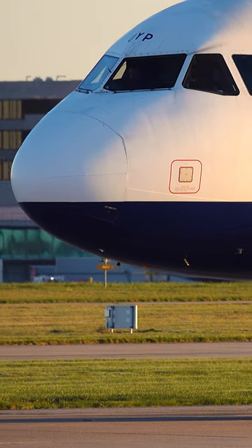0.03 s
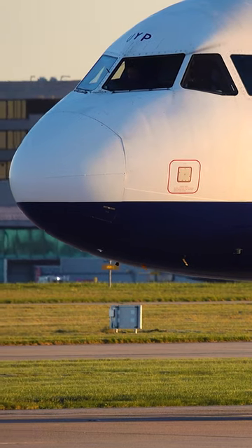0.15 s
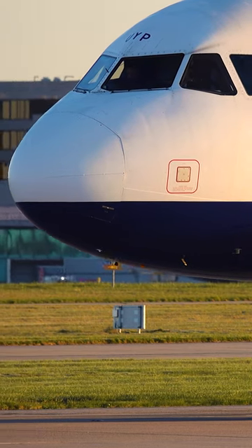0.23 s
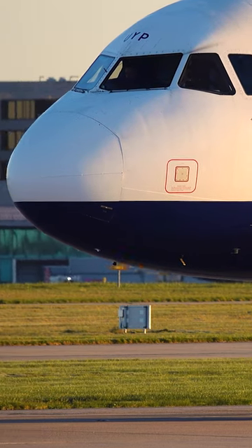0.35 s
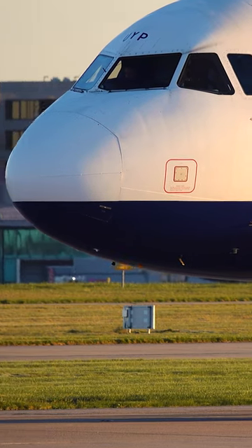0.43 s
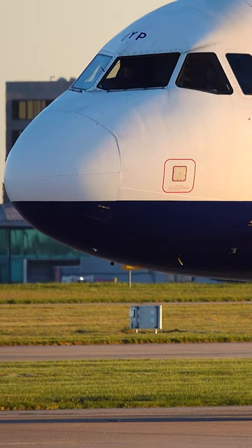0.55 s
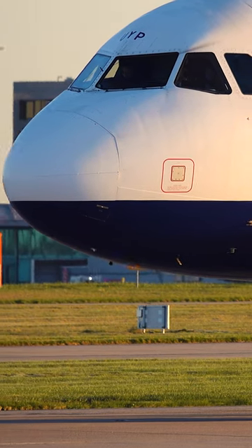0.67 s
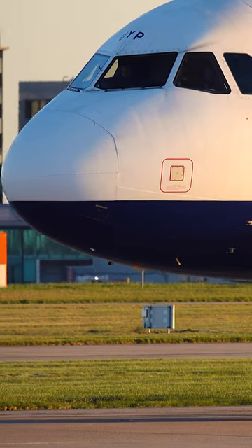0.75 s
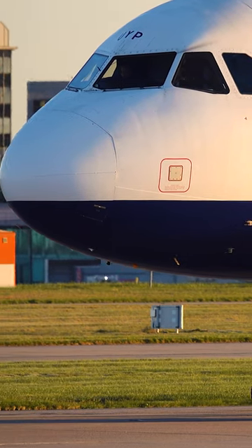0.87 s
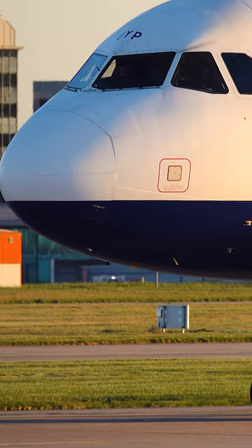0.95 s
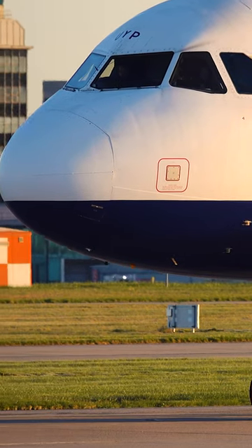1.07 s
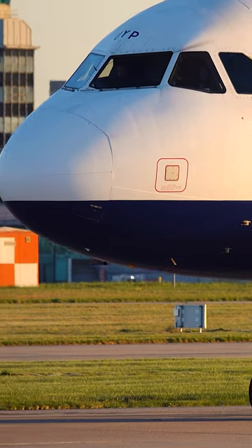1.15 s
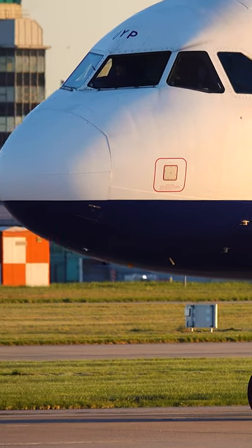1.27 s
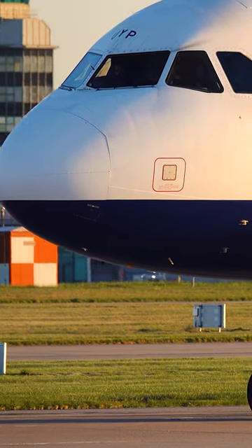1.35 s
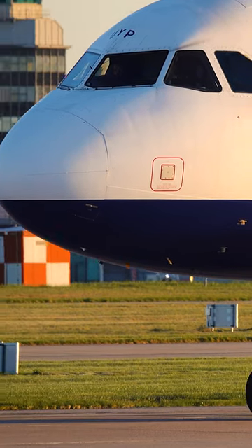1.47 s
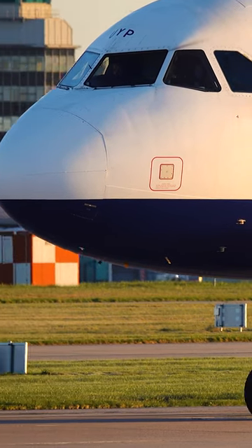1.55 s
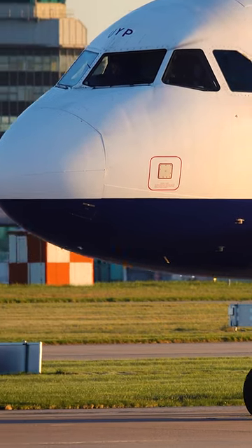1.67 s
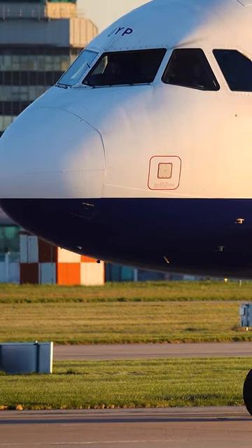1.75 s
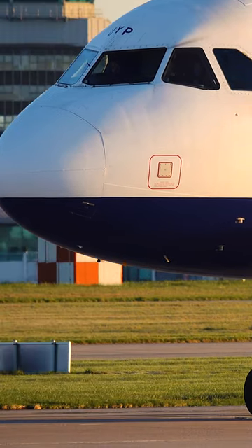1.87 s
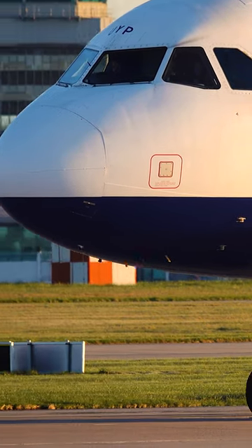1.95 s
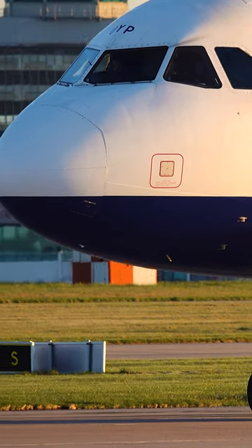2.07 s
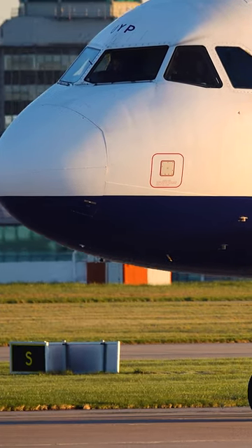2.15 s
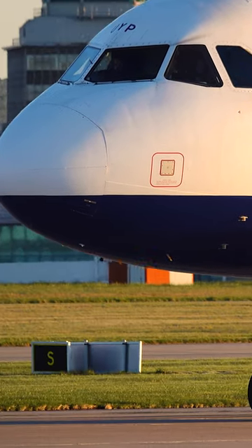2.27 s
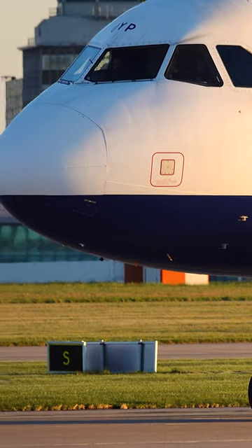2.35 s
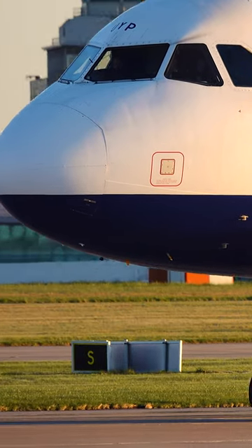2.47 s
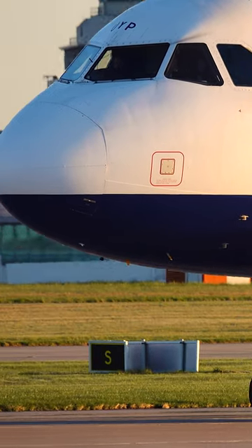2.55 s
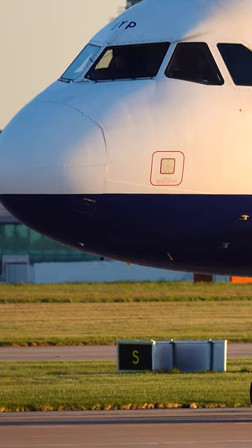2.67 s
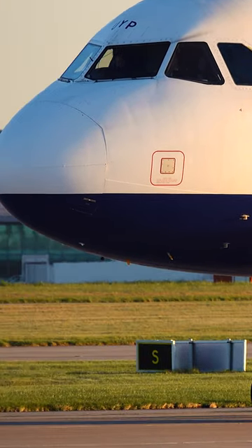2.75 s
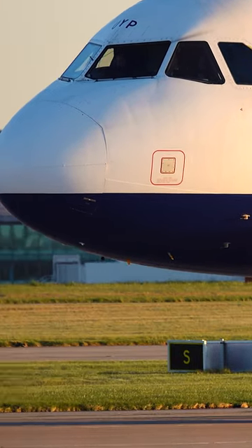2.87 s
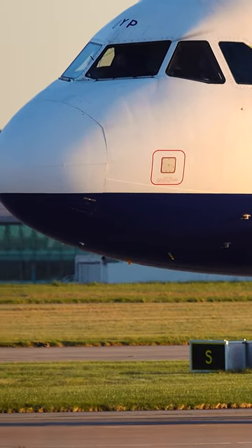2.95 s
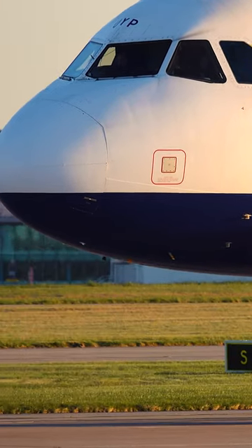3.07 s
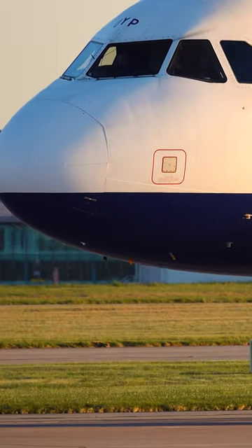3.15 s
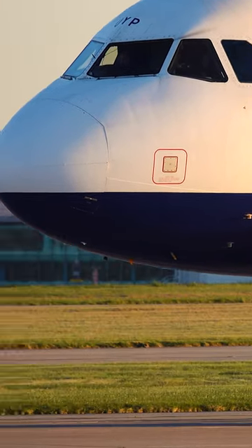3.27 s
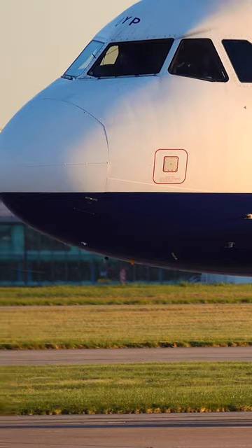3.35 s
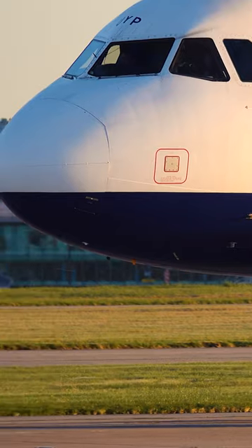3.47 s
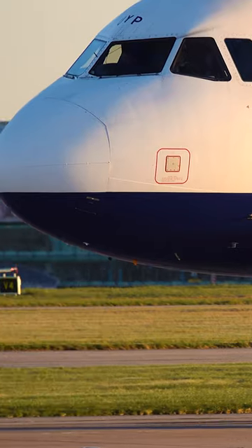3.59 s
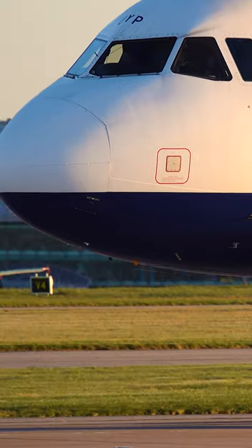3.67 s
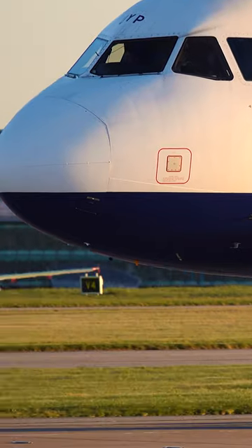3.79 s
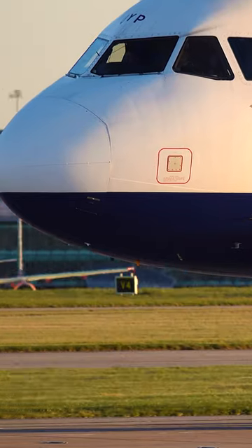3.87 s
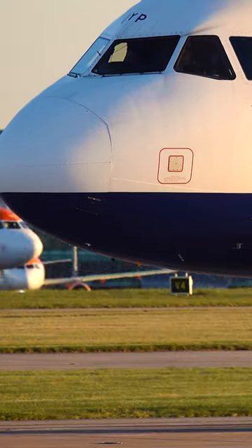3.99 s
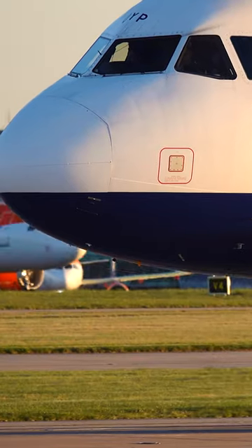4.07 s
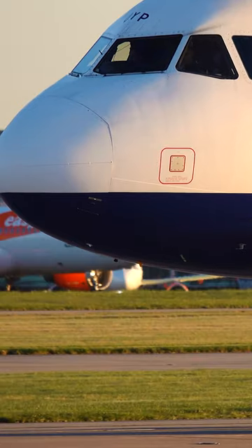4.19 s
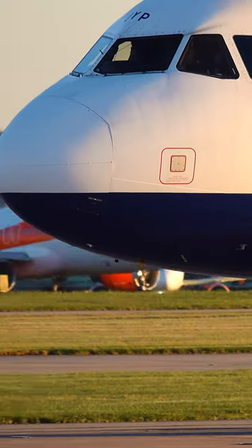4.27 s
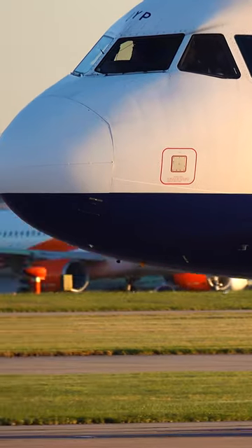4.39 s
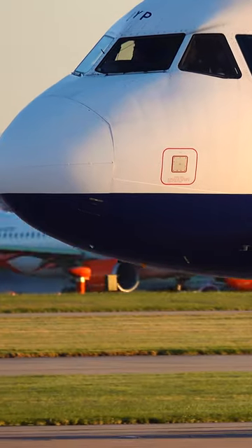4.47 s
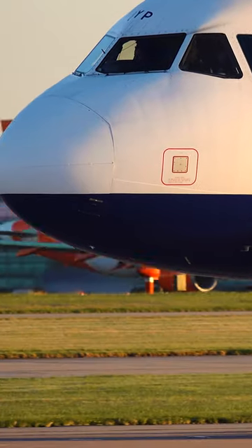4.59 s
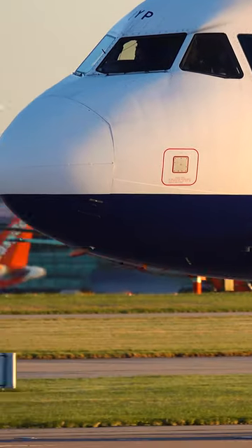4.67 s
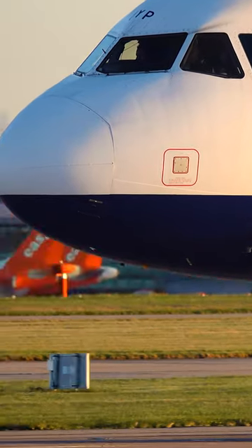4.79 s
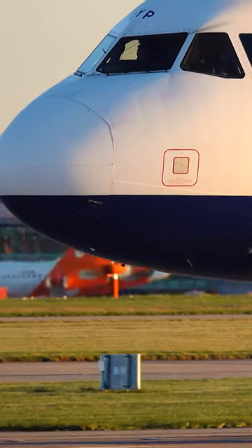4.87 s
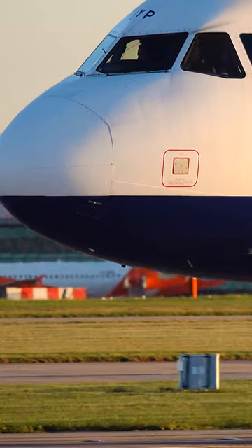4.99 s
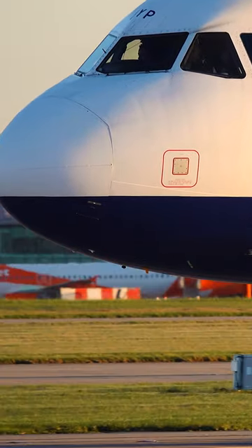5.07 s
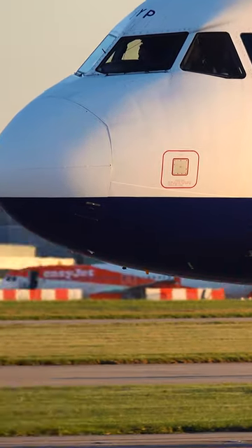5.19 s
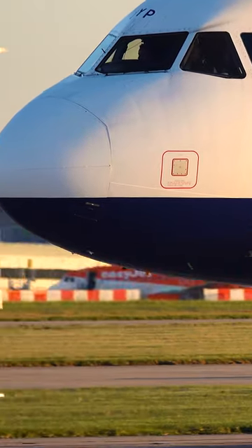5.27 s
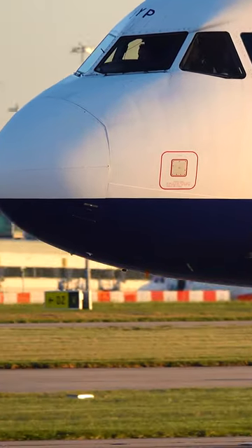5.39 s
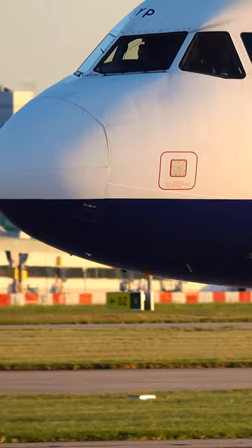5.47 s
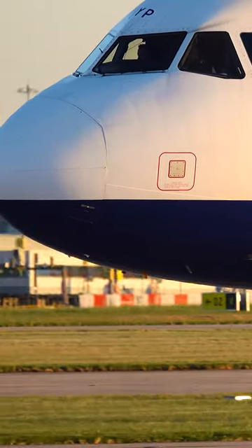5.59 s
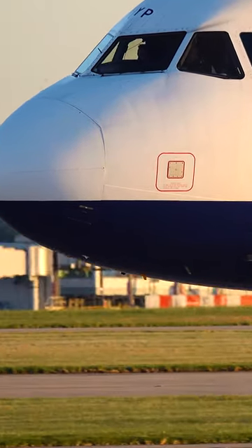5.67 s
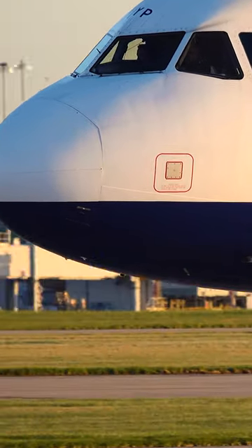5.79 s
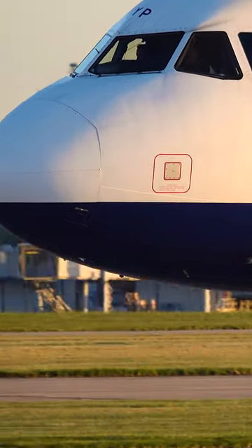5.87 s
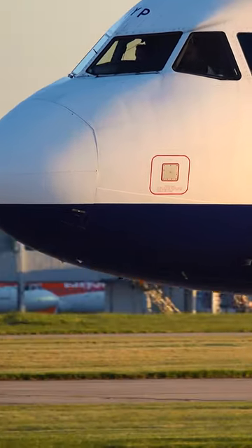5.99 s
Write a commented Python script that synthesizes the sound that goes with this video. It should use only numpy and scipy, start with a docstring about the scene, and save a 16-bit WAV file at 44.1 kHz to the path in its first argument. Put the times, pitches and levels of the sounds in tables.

```python
"""Across a grass verge from one microphone, a twin-jet airliner spools up and starts its take-off roll.
Two 22-blade fans whine slightly out of step, as sines that turbulent air roughens in level and phase.
Once the blade tips go supersonic, sines on many shaft orders and one repeating shock pattern buzz.
Exhaust roar and fan rush are coloured noises that grow with thrust; a thin tone lies under the start."""
import sys
import numpy as np
from scipy import signal
from scipy.fft import rfft, irfft
from scipy.io import wavfile

SR = 44100
rng = np.random.default_rng(int(sys.argv[2]) if len(sys.argv) > 2 else 0)


def ratio_of_db(decibels):
    """Turn decibels (scalar or array-like) into linear amplitude factors; 0 dB maps to 1."""
    return 10 ** (np.asarray(decibels, float) / 20)


def output_pcm(signal):
    """Save a mono or channel-first signal as 16-bit PCM at the path in sys.argv[1].

    Samples are clipped to [-1, 1] before scaling.
    """
    pcm = np.clip(np.atleast_2d(signal).T, -1, 1) * 32767
    wavfile.write(sys.argv[1], SR, np.round(pcm).astype(np.int16))


N = 266364
T = np.arange(N) / SR  # seconds
BLADES = 22  # on each fan
BUZZ_ONSET_S, BUZZ_RISE_S = 3.465, 0.11


def rms_one(x):
    """Scale to unit rms."""
    return x / np.sqrt(np.mean(np.abs(x) ** 2) + 1e-20)


def drift(rate_hz):
    """Slow chance of spread 1: coarse noise through a double one-pole low-pass."""
    step = 64  # samples between coarse values
    settle = 3000  # coarse values dropped while the filter settles
    pole = np.exp(-2 * np.pi * rate_hz * step / SR)
    noise = rng.standard_normal(N // step + settle + 2)
    slow = signal.lfilter([1], [1, -2 * pole, pole ** 2], noise)[settle:]
    return np.interp(np.arange(N) / step, np.arange(len(slow)), rms_one(slow))


def tone(turns, db, rough, rate_hz):
    """A sine of given rms level; turbulent air scatters a share (rough) of it in level and phase."""
    share = np.clip(rough, 0, 1)
    scatter = drift(rate_hz) + 1j * drift(rate_hz)
    air = np.sqrt(1 - share) + np.sqrt(share / 2) * scatter
    spin = np.exp(2j * np.pi * (turns + rng.random()))
    return np.sqrt(2) * ratio_of_db(db) * np.real(air * spin)


def coloured(points, flutter_db):
    """Noise with a given spectrum whose level flutters a little."""
    hz, db = np.transpose(points)
    bins_hz = np.fft.rfftfreq(N, 1 / SR) + 1  # 1 Hz up, to keep the logarithm finite
    shape = ratio_of_db(np.interp(np.log(bins_hz), np.log(hz), db, left=-90, right=-90))
    noise = irfft(rfft(rng.standard_normal(N)) * shape, N)
    return rms_one(noise) * ratio_of_db(flutter_db * drift(3.5))


# Both fans running up.
# Each row: time in seconds, near fan blade-pass rate in Hz, far fan blade-pass rate in Hz.
FAN_SPEEDS = [(0, 914.5, 924), (.6, 925, 939), (1, 956, 959), (1.4, 993.6, 1021), (1.8, 1060, 1088),
              (2.2, 1154, 1177), (2.6, 1263, 1293), (2.95, 1366, 1404), (3.3, 1498, 1519),
              (3.5, 1542, 1559), (3.7, 1567, 1572), (3.9, 1585, 1573), (4.5, 1583, 1600), (4.9, 1601, 1620),
              (5.2, 1606, 1622), (5.4, 1620, 1623), (5.6, 1630, 1627), (6.04, 1632, 1635)]


def spool():
    """Blade-pass rates of both fans in Hz, and the thrust from near 0 at idle to 1 at full power."""
    idle_hz, full_hz = 914, 1600
    s, near, far = np.transpose(FAN_SPEEDS)
    near_hz, far_hz = np.interp(T, s, near), np.interp(T, s, far)
    thrust = np.clip((near_hz - idle_hz) / (full_hz - idle_hz), 1e-4, 1)
    return near_hz, far_hz, thrust


def near_shaft():
    """Turns of the near fan's shaft since the start: its blade passes shared among the blades."""
    return np.cumsum(spool()[0]) / SR / BLADES


def supersonic():
    """0 while the blade tips are subsonic, 1 once they carry shocks."""
    return .5 + .5 * np.tanh((T - BUZZ_ONSET_S) / BUZZ_RISE_S)


# A tone on the near shaft swells or fades for a moment as the air carries it;
# orders 59 and 60 are late high buzz lines, likely from the far fan, played here on the near shaft.
# Each row: centre in seconds, half length in seconds, shaft order, change in dB.
AIR_SWELLS = [(.38, 0.049, 22, 7), (0.594, .07, 22, 9), (0.763, 0.093, 22, 9.5), (0.902, .1, 22, 4.5),
              (1.401, 0.13, 22, 10), (1.86, 0.12, 22, 7.5), (2.19, 0.076, 22, 5.5), (2.843, 0.052, 22, 5.5),
              (3.341, 0.059, 22, 12), (3.626, 0.078, 22, 7), (3.777, .07, 22, 5), (4.25, 0.13, 22, 8.5),
              (4.5, 0.086, 22, 9), (5.16, 0.1, 22, 5.5), (5.653, 0.16, 22, 4.5), (5.893, 0.051, 22, 4.5),
              (1.2, 0.15, 44, 3.5), (2.38, 0.09, 44, 7.5), (2.806, 0.2, 44, 6.5), (3.139, 0.042, 44, 12),
              (3.242, 0.042, 44, 13.5), (3.39, 0.05, 44, 8.5), (3.517, 0.08, 44, 8.5),
              (4.9, 0.24, 44, 10.5), (5.25, 0.082, 44, 7), (5.514, 0.07, 44, 6), (5.796, .08, 44, 6.5),
              (4.17, 0.15, 12, 9), (4.474, 0.044, 12, 10.5), (5.35, 0.25, 12, 6), (4.915, .13, 11, 9.5),
              (4.85, .18, 12, -6), (5.751, .12, 12, -6), (5.75, .22, 10, 8), (3.7, .2, 23, 5),
              (5.62, .12, 17, 12), (3.58, .07, 18, 7), (4.25, .13, 18, 5), (5.3, .2, 18, 4),
              (5.97, 0.06, 11, 7), (1.45, 0.2, 66, 5), (2.88, 0.15, 66, -9), (2.25, 0.16, 91, 7),
              (2.9, .12, 91, 8), (5.8, 0.31, 23, 8), (5.68, .2, 59, 5), (5.75, .25, 60, 7)]


def swell_db(order):
    """Bell-shaped swells and fades at the whole shaft order nearest to the one given."""
    return sum(change_db * np.exp(-((T - s) / half_s) ** 2)
               for s, half_s, k, change_db in AIR_SWELLS if round(k) == round(order))


def near_blade_tones():
    """Near fan's blade passes and their second harmonic: ragged at first, steadier as it speeds up."""
    shaft, thrust, locked = near_shaft(), spool()[2], supersonic()
    first_db = np.interp(thrust, [0, 1], [-42, -22.5]) + swell_db(BLADES)  # idle, full thrust
    second_db = np.interp(thrust, [0, 1], [-44, -31]) + swell_db(2 * BLADES)
    first = tone(BLADES * shaft, first_db, rough=.4 - .33 * locked, rate_hz=11)
    second = tone(2 * BLADES * shaft, second_db, rough=.4 - .35 * thrust, rate_hz=14)
    return first + second


# Upper blade harmonics and compressor stages, each heard best at one speed.
# Each row: shaft order, peak level in dB, thrust 0-1 at the peak, thrust span in which it falls 10 dB.
STAGE_WHINE = [(66, -41.5, .18, .36), (90.6, -52, .45, .45), (116.4, -55, .12, .42), (138.3, -58, .05, .25),
               (144.4, -57, 0, .15), (160.3, -62, .07, .25), (182.4, -66, .04, .25)]


def near_whine():
    """High tones locked to the near shaft, which give way as the blade tips go supersonic."""
    shaft, thrust, out = near_shaft(), spool()[2], 0
    for order, peak_db, best, span in STAGE_WHINE:
        db = peak_db - 10 * ((thrust - best) / span) ** 2 + swell_db(order)
        out = out + tone(order * shaft, db, rough=.63, rate_hz=23)
    return (1 - supersonic()) * out


# Turbulence cut by the near fan's blades spreads into humps.
# Each row: shaft order, level subsonic in dB, level supersonic in dB, half width in Hz.
TURBULENCE_HUMPS = [(21.17, -44.5, -32.5, 82), (43.6, -40.5, -46, 43), (65.66, -40, -59.5, 71),
                    (87.4, -47, -48.5, 200)]


def near_humps():
    """Almost wholly scattered tones: narrow bands of noise around the blade harmonics."""
    shaft, locked, out = near_shaft(), supersonic(), 0
    for order, subsonic_db, supersonic_db, half_width_hz in TURBULENCE_HUMPS:
        db = subsonic_db + (supersonic_db - subsonic_db) * locked + swell_db(order)
        out = out + tone(order * shaft, db, rough=.99, rate_hz=half_width_hz)
    return out


def far_fan_fade_db():
    """The far fan fades by 10 dB around 5.4 s, as its pitch meets the near fan's."""
    fade_s, width_s, loss_db = 5.4, .1, 10
    return loss_db * (.5 + .5 * np.tanh((T - fade_s) / width_s))


def far_blade_tones():
    """The other engine's blade tone and a weaker second harmonic."""
    _, hz, thrust = spool()
    turns = np.cumsum(hz) / SR
    first_db = np.interp(thrust, [0, 1], [-37, -28]) - far_fan_fade_db()  # idle, full thrust
    second_db = first_db - 5.5 - 6.5 * supersonic()
    first = tone(turns, first_db, rough=.4 - .25 * thrust, rate_hz=14)
    return first + tone(2 * turns, second_db, rough=.3, rate_hz=11)


def thin_tone():
    """A faint, nearly pure tone under the fans that climbs ever faster and fades out around 2 s."""
    start_hz, climb_hz_per_s2 = 852, 11.3
    end_s, fade_s = 2.0, .05
    hz = start_hz + climb_hz_per_s2 * T ** 2
    fade = .5 - .5 * np.tanh((T - end_s) / fade_s)
    return fade * tone(np.cumsum(hz) / SR, -39.5, rough=.037, rate_hz=6.4)


def power_gain(idle_db, gained_db, exponent, db_per_s, reach=1, from_s=0):
    """Gain that grows with thrust up to reach, and steadily from from_s as the aircraft nears."""
    thrust_db = gained_db * np.minimum(spool()[2] / reach, 1) ** exponent
    nearing_db = db_per_s * np.maximum(T - from_s, 0)
    return ratio_of_db(idle_db + thrust_db + nearing_db)


# Spectra of the exhaust, with a gap near 190 Hz between the two.
# Each row: frequency in Hz, relative level in dB.
RUMBLE_COLOUR = [(20, -32.5), (40, -17), (70, -2), (110, -1.5), (145, -3.5), (185, -18), (240, -32)]
ROAR_COLOUR = [(150, -22.5), (230, -6), (350, 0), (480, 0.5), (620, -4), (850, -1.5), (1150, -7),
               (1500, -8.5), (2100, -31), (3000, -35.5)]


def exhaust():
    """Jet mixing noise: a deep rumble and the roar above it."""
    rumble = power_gain(-41, 13, .37, db_per_s=.45) * coloured(RUMBLE_COLOUR, flutter_db=.43)
    roar = power_gain(-36.5, 11, .83, db_per_s=.7045) * coloured(ROAR_COLOUR, flutter_db=.36)
    return rumble + roar


# Spectra of the air rushing through the fans.
# Each row: frequency in Hz, relative level in dB.
RUSH_COLOUR = [(700, -4.5), (1300, -3.5), (1900, -3), (2300, -3.5), (2850, -2), (2980, 1.5), (3120, 0),
               (3560, -3), (3850, -13), (4800, -19.5)]
HISS_COLOUR = [(3200, -14), (4200, -1.5), (5200, -3.5), (6400, -10), (8000, -16.5), (10000, -27),
               (13000, -37.5), (16500, -54)]


def fan_rush():
    """Fan turbulence: a middle rush, and a hiss that levels off at half thrust, then rises from 3.6 s."""
    rush = power_gain(-30.5, 5.5, .56, db_per_s=.5) * coloured(RUSH_COLOUR, flutter_db=.7)
    hiss_gain = power_gain(-46, 6.3, .55, db_per_s=1.6, reach=.5, from_s=3.6)
    return rush + hiss_gain * coloured(HISS_COLOUR, flutter_db=.4)


# Shock waves off unequal blades, some gaining and some losing as the aircraft draws abeam;
# orders 59 and 60 are late high buzz lines, likely from the far fan, played here on the near shaft.
# Each row: shaft order, level as the buzz sets in in dB, change in dB per second.
NEAR_SHOCKS = [(9, -50, 5.5), (10, -42, 3.5), (11, -35.5, .8), (12, -35, 0), (13, -36.5, 1), (14, -41, 0),
               (17, -47, 0), (18, -36, 1.8), (19, -37, -0.5), (21, -38.5, 0), (23, -38, -3), (25, -41, -1),
               (26, -30, -2), (27, -32, -2), (29, -48, 3.5), (30, -49, 4.5), (31, -45, 4), (32, -41, 1),
               (33, -43.5, 4), (34, -39.5, 1.5), (35, -52, 7.5), (38, -48, 3.5), (39, -45, 0.5),
               (40, -42.5, 1.5), (42, -47.5, 1), (43, -43, 1.5), (45, -35.5, -0.5), (47, -42, .7),
               (48, -38, -2), (49, -50, 4), (59, -60, 3.5), (60, -61, 3.5)]


def near_shaft_buzz():
    """Supersonic blade tips shed uneven shocks, so orders between the blade harmonics sound too."""
    shaft, out = near_shaft(), 0
    for order, onset_db, db_per_s in NEAR_SHOCKS:
        db = onset_db + db_per_s * (T - BUZZ_ONSET_S) + swell_db(order)
        out = out + tone(order * shaft, db, rough=.16, rate_hz=4)
    return supersonic() * out


# Mean level of a weak shock pattern on all the near fan's orders.
# Each row: shaft order, level in dB.
WEAK_SHOCKS = [(0, -63), (5, -45.5), (45, -56), (55, -57.5), (80, -64.5), (87, -62), (92, -62.5),
               (110, -86)]


def shock_pattern():
    """A weak, uneven pattern of shocks on every order of the near fan, the same on every turn."""
    size = 2048  # points a turn
    orders = np.arange(size // 2 + 1)
    db = np.interp(orders, *np.transpose(WEAK_SHOCKS), right=-200)
    db += 4 * rng.standard_normal(len(orders))  # uneven from order to order
    phases = np.exp(2j * np.pi * rng.random(len(orders)))
    turn = irfft(ratio_of_db(db) * phases) * size / np.sqrt(2)
    return supersonic() * np.interp(near_shaft() % 1 * size, np.arange(size), turn, period=size)


# Shock waves off the far fan.
# Each row: shaft order, level as the buzz sets in in dB before the late fade, change in dB per second.
FAR_SHOCKS = [(10, -45, 6.5), (12, -39, .3), (14, -40, 2.5), (19, -48, 8), (31, -41, 1.5), (33, -50, 6),
              (42, -44, 3), (43, -42, 1.5)]


def far_buzz():
    """The far fan's own shocks, which fade along with its blade tones."""
    shaft, fade_db, out = np.cumsum(spool()[1]) / SR / BLADES, far_fan_fade_db(), 0
    for order, onset_db, db_per_s in FAR_SHOCKS:
        db = onset_db + db_per_s * (T - BUZZ_ONSET_S) - fade_db
        out = out + tone(order * shaft, db, rough=.15, rate_hz=4)
    return supersonic() * out


def scene():
    """All sources, heard as one channel."""
    near = near_blade_tones() + near_whine() + near_humps() + near_shaft_buzz() + shock_pattern()
    far = far_blade_tones() + far_buzz()
    return (near + far + thin_tone() + exhaust() + fan_rush())[None, :]


def top_cut(x):
    """Nothing passes above the cut-off."""
    return signal.sosfilt(signal.butter(12, 15610, fs=SR, output="sos"), x)


def record(dry):
    """Faint microphone hiss, then soft ends of 4 ms."""
    heard = dry + ratio_of_db(-79.5) * rng.standard_normal(dry.shape)
    to_nearest_end = np.minimum(np.arange(N), np.arange(N)[::-1])
    ends = np.clip(to_nearest_end / (.004 * SR), 0, 1)
    finished = heard * np.sin(np.pi / 2 * ends) ** 2
    return top_cut(finished)


dry = scene()
out = record(dry)
output_pcm(out)
```